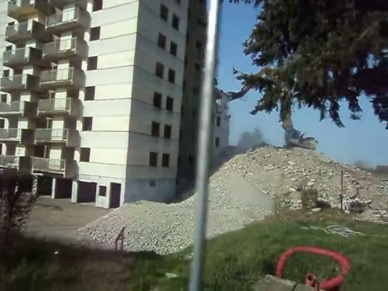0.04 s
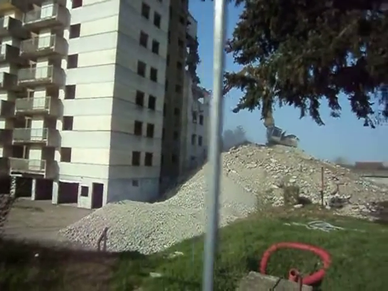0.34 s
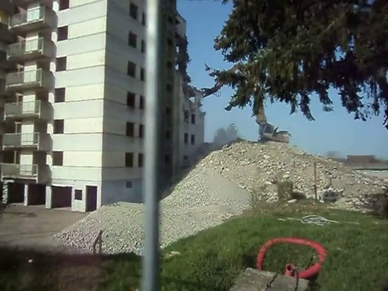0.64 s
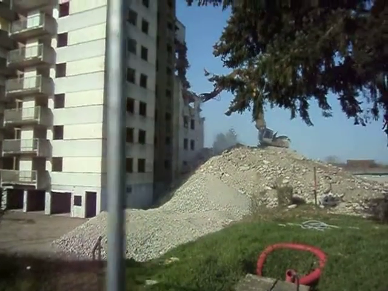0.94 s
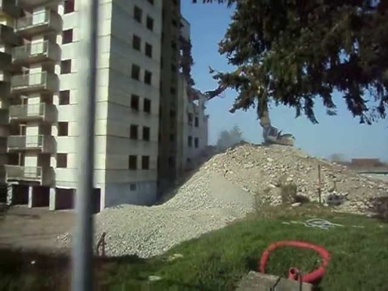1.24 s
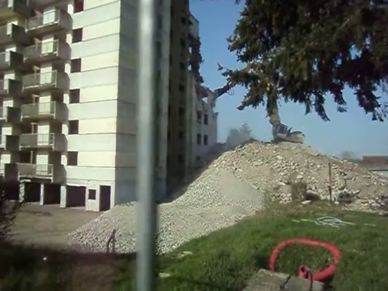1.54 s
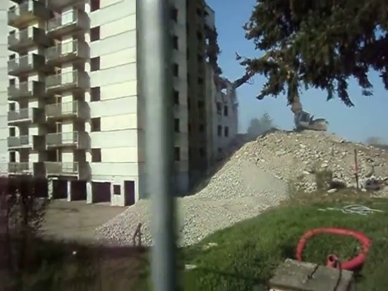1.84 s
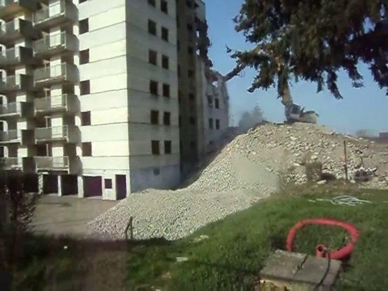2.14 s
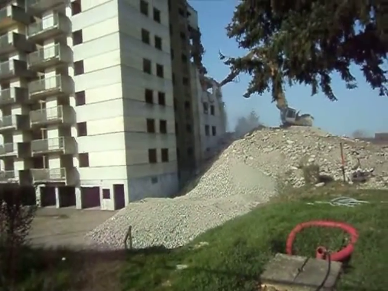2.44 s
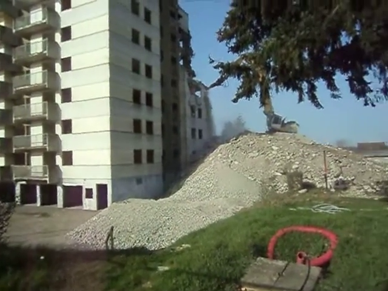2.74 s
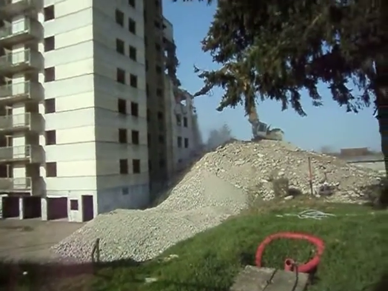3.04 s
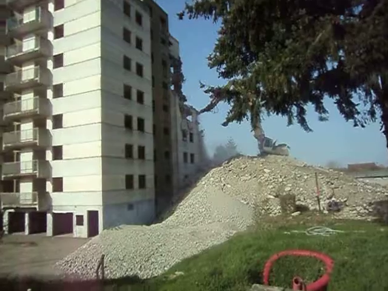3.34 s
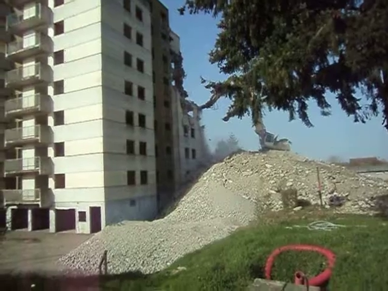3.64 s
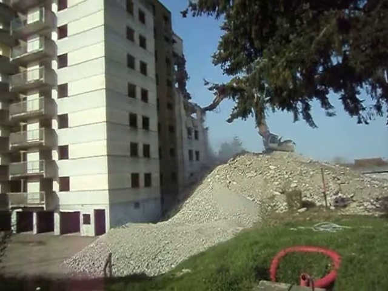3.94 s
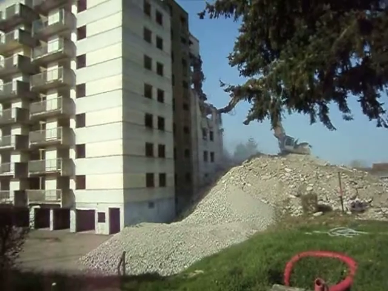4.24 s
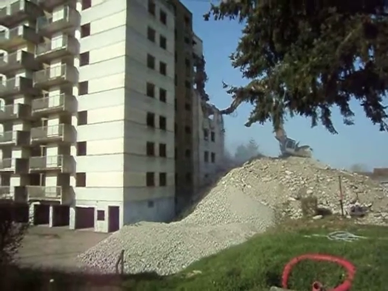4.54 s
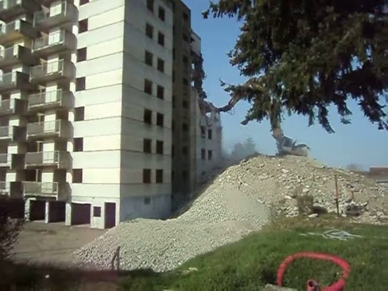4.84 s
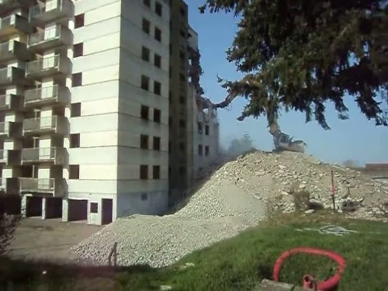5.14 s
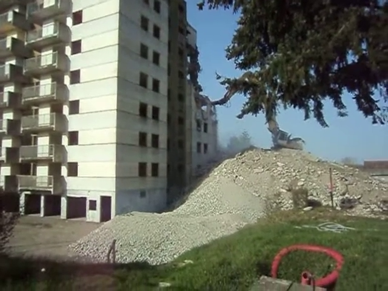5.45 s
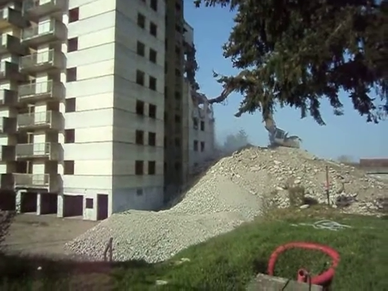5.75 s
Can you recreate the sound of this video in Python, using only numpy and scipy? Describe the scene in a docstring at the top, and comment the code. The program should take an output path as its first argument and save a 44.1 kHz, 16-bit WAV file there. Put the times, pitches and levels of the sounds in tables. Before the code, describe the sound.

Close clicks, pops and small rubs on the microphone stand out over the steady hum of a diesel excavator working some way off in the open air. Its steel rasps and sticks against crumbling concrete. Just past halfway the handling noises stop and chunks of concrete land with dull knocks, followed by several slides of rubble and more jerky metal scraping over the engine.

```python
"""A work site, where an excavator digs behind a rubble heap. Its diesel engine and cooling fan drone,
concrete crunches and tumbles, and steel rasps as it sticks and slips. Right at the microphone there are
brief rubs, sharp clicks and hollow pops. The loudest of these make the camera's gain control turn the
whole site down for about a second."""
import sys
import numpy as np
from scipy.fft import rfft, irfft, next_fast_len
from scipy.io import wavfile
from scipy.ndimage import uniform_filter1d, minimum_filter1d, map_coordinates

SR = 44100
rng = np.random.default_rng(int(sys.argv[2]) if len(sys.argv) > 2 else 0)


def inscribe(sig):
    """Save sig as 16-bit PCM at rate SR to the path in sys.argv[1].

    A 1-D sig is mono; a 2-D sig holds one channel per row.
    Samples are clipped to [-1, 1] before scaling.
    """
    pcm = np.round(np.clip(np.atleast_2d(sig).T, -1, 1) * 32767)
    wavfile.write(sys.argv[1], SR, pcm.astype(np.int16))


N = 265041


def amp(db):
    """Turn decibels into a number to multiply by."""
    return 10 ** (np.asarray(db) / 20)

def unit(x):
    """Scale a sound to an average strength (rms) of 1."""
    return x / np.sqrt(np.mean(x ** 2) + 1e-20)

def clock():
    """The time of every sample, in seconds."""
    return np.arange(N) / SR

def wobble(per_s):
    """A smooth curve through per_s random values a second."""
    return map_coordinates(rng.standard_normal(2048), [clock() * per_s], mode="wrap")

def swells(rest_db, rows):
    """A steady level in dB plus a bell-shaped swell for each row of peak_s, half_length_s, level_db."""
    power = sum(amp(db) ** 2 * np.exp(-((clock() - s) / half) ** 2 / 2) for s, half, db in rows)
    return 10 * np.log10(amp(rest_db) ** 2 + power)

def filtered(x, response):
    """Turn each frequency up or down by response(hz)."""
    size = next_fast_len(len(x) + 8192)
    return irfft(rfft(x, size) * response(np.fft.rfftfreq(size, 1 / SR)), size)[:len(x)]

def coloured(x, points):
    """Shape the bass and treble along a curve of pitch_hz, level_db points."""
    pitches, db = np.transpose(points)
    return filtered(x, lambda hz: amp(np.interp(np.log(hz + 1), np.log(pitches), db)))

def resonated(x, tones):
    """Make a sound ring at each row of pitch_hz, width_hz, level_db. Narrow tones ring longer."""
    return filtered(x, lambda hz: sum(
        amp(db) * 1j * hz * width / (pitch ** 2 - hz ** 2 + 1j * hz * width)
        for pitch, width, db in tones))

def grains(per_s, spread_db):
    """Tiny hits at random times, a few much stronger than the rest."""
    struck = rng.random(N) < per_s / SR
    sizes = amp(spread_db * np.minimum(rng.exponential(size=N), 4))
    return unit(struck * sizes * np.sign(rng.standard_normal(N)))

def add(track, start_s, sound):
    """Mix a sound into the track from start_s on."""
    part = track[max(round(start_s * SR), 0):][:len(sound)]
    part += sound[:len(part)]


# The hum of the exhaust: multiple_of_firing_rate, level_db
EXHAUST_TONES = [(3, -44), (6, -50.5), (7, -48.5)]
# Moments when the machine works harder: peak_s, fan_level_db
ENGINE_LOADS = [(0.082, -38.5), (1, -36.5), (2.3, -46.5), (3.999, -44), (5.72, -46)]
# Tone colour of the engine's roar: pitch_hz, level_db
ROAR_COLOUR = [(120, -25), (200, -1), (255, -7), (315, -1), (385, 4.5), (480, -21.5), (560, -6.5),
               (900, -8.5), (1300, -9.5), (2200, -16.5), (3400, -14.5), (4300, -23.5), (6000, -32.5)]

def engine(firing_hz=75.6, fan_idle_hz=290.2, fan_idle_db=-53.5, fan_hz_per_db=0.27):
    """A steady diesel hums and throbs with each firing. Under load its fan gets louder and higher."""
    cycle = 2 * np.pi * np.cumsum(firing_hz * (1 + 0.0016 * wobble(4))) / SR
    exhaust = sum(amp(db + 2.4 * wobble(6.1)) * unit(np.sin(multiple * cycle + 2 * np.pi * rng.random()))
                  for multiple, db in EXHAUST_TONES)
    fan_db = swells(fan_idle_db, [(peak_s, 0.25, db) for peak_s, db in ENGINE_LOADS])
    blade_hz = fan_idle_hz + fan_hz_per_db * (fan_db - fan_idle_db)
    blade_phase = 2 * np.pi * np.cumsum(blade_hz * (1 + 0.017 * wobble(30))) / SR
    fan = amp(fan_db + 1.5 * wobble(16)) * unit(np.sin(blade_phase))
    throb = 1 + 0.24 * np.cos(cycle)
    roar = unit(coloured(rng.standard_normal(N) * throb, ROAR_COLOUR))
    return exhaust + fan + amp(-37.5 + 1.7 * wobble(1.8)) * roar


# Tone colours of the low rumble and of crunching concrete: pitch_hz, level_db
RUMBLE_COLOUR = [(15, -35), (30, -1), (48, -10.5), (62, 1.5), (85, 4.5), (120, 2), (165, 4), (230, -3.5),
                 (500, -30)]
CRUNCH_COLOUR = [(200, -36), (400, -2.5), (560, 4), (760, 0.5), (930, -7), (1100, -1), (1400, -6),
                 (2200, -18), (3500, -16.5), (4600, -26.5), (6000, -33.5)]
# Slides of rubble: peak_s, half_length_s, crunch_db, rumble_db
RUBBLE_SLIDES = [(0.08, 0.2, -36, -37), (1.25, 0.11, -39, -58), (2.55, 0.18, -43.5, -55.5),
                 (3.458, 0.13, -47.5, -46), (4.15, 0.19, -34, -44.5), (4.741, 0.086, -31, -37.5),
                 (5.265, 0.14, -36.5, -34.5), (5.8, 0.18, -36, -42)]

def rubble(crunch_rest_db=-39.5, rumble_rest_db=-44.5):
    """Concrete crumbles in many tiny hits over a low rumble, swelling with each slide."""
    crunch_db = swells(crunch_rest_db, [(s, half, db) for s, half, db, _ in RUBBLE_SLIDES])
    rumble_db = swells(rumble_rest_db, [(s, half, db) for s, half, _, db in RUBBLE_SLIDES])
    rumble = amp(rumble_db + 0.32 * wobble(11)) * unit(coloured(rng.standard_normal(N), RUMBLE_COLOUR))
    crumbs = grains(per_s=700, spread_db=2.5) + 0.86 * rng.standard_normal(N)
    crunch = amp(crunch_db + 1.1 * wobble(22)) * unit(coloured(crumbs, CRUNCH_COLOUR))
    return rumble + crunch


# Big lumps of concrete landing: start_s, level_db, pitch_hz, thud_db (compared with the knock)
FALLING_LUMPS = [(2.547, -26.5, 610, -29), (2.574, -30, 418, -22), (3.3654, -23.5, 795, -8),
                 (3.382, -17, 706, -5.5), (3.406, -23.5, 640, -12), (3.445, -26.5, 666, -10),
                 (5.386, -26.5, 520, -13)]

def lumps(knock_fade_s=0.074, thud_fade_s=0.21, thud_hz=105):
    """Each lump lands with a dull knock of two close tones, a spray of grit and a thud in the ground."""
    out, t = np.zeros(N), np.arange(SR // 4) / SR
    for start_s, level_db, pitch_hz, thud_db in FALLING_LUMPS:
        grit = unit(coloured(rng.standard_normal(len(t)), CRUNCH_COLOUR))
        knock = np.sin(2 * np.pi * pitch_hz * 0.915 * t) + np.sin(2 * np.pi * pitch_hz * 1.1 * t)
        stone = (1.03 * knock + 1.32 * grit) * amp(-60 * t / knock_fade_s)
        thud = amp(thud_db - 60 * t / thud_fade_s) * np.sin(2 * np.pi * thud_hz * t)
        rise = 1 - np.exp(-t / 0.0033)
        add(out, start_s, amp(level_db) * rise * (stone + thud))
    return out


# Short jerks of steel that sticks and slips: start_s, level_db
STEEL_SLIPS = [(0.554, -33.5), (0.585, -35), (0.621, -35), (0.656, -36.5), (0.7, -34.5), (0.779, -34),
               (0.927, -39), (1.835, -43), (1.963, -41), (3.773, -39), (3.834, -39.5), (4.47, -36),
               (4.541, -37), (4.597, -37.5), (4.77, -37.5), (5.038, -35), (5.131, -33.5), (5.544, -33.5),
               (5.595, -35), (5.665, -33.5), (5.762, -34), (5.858, -32.5), (5.925, -33), (5.972, -32.5)]
# Longer drags of steel under load: start_s, level_db, length_s
STEEL_DRAGS = [(0.97, -46, .42), (1.086, -40.5, 0.13), (1.55, -41.5, 0.17), (2.237, -47.5, 0.026),
               (2.4, -46.5, 0.11), (2.58, -42.5, 0.19), (3.863, -41, .56), (4.632, -36.5, 0.11)]
# The tones the steel rings at: pitch_hz, width_hz, level_db
STEEL_TONES = [(1070, 43, -28), (1426, 41, -17), (1727, 9, 4.5), (1983, 27, 6.5), (2290, 4.3, 4.5),
               (2653, 34, 1), (2810, 24, -1), (3040, 87, -4), (3250, 82, 6), (3440, 43, 3.5),
               (3410, 17, -12), (3700, 92, -8)]
# Tone colour of the rasp: pitch_hz, level_db
RASP_COLOUR = [(500, -56.5), (1000, -14.5), (1600, 2), (2400, 4.5), (2950, 0), (3400, -3.5), (4000, -1),
               (4600, -37.5), (6000, -32)]

def scraping_steel(slip_length_s=0.015, rise_s=0.002, fade_s=0.17):
    """Each slip or drag rasps the steel. Its wide tones sound at once; narrow ones swell and linger."""
    t, power = np.arange(SR) / SR, np.zeros(N)
    slips = [(start_s, level_db, slip_length_s) for start_s, level_db in STEEL_SLIPS]
    bite_db = 3 * np.exp(-t / 0.022)  # each stroke starts a little harder
    for start_s, level_db, length_s in slips + STEEL_DRAGS:
        fade_db = 60 * np.maximum(t - length_s, 0) / fade_s
        stroke = np.minimum(t / rise_s, 1) * amp(level_db + bite_db - fade_db)
        add(power, start_s, stroke ** 2)
    force = (np.sqrt(power) + amp(-72)) * amp(0.97 * wobble(57))
    roughness = grains(per_s=2500, spread_db=3) + 0.68 * rng.standard_normal(N)
    ring = resonated(force * roughness, STEEL_TONES) / np.std(resonated(roughness, STEEL_TONES))
    rasp = force * unit(coloured(grains(per_s=4000, spread_db=8), RASP_COLOUR))
    return amp(-1) * ring + amp(-4.5) * rasp


# Rubs at the microphone: peak_s, level_db, half_length_s, pitch_hz
CLOSE_RUBS = [(0.389, -22.5, 0.0068, 1830), (1.449, -24.5, 0.0093, 1846), (1.469, -14.5, 0.0048, 1476),
              (1.739, -30, 0.016, 1433), (2.183, -19, 0.0035, 1367), (2.408, -31, 0.0096, 1354),
              (2.797, -25, 0.025, 721), (2.858, -18.5, 0.015, 706), (3.005, -15.5, 0.012, 780)]
# Higher tones of the rubbed hollow: multiple_of_pitch, width_hz, level_db
HOLLOW_TONES = [(2.081, 156, 12.5), (2.66, 171, -5), (3.899, 294, -2.5), (5.948, 200, 4.5)]
# Tone colour of the rubbing hiss: pitch_hz, level_db
FRICTION_COLOUR = [(200, -34.5), (600, 9.5), (1200, 4), (1600, -1.5), (2100, 7), (2500, -12), (3000, 3),
                   (3700, -7), (4600, -9), (6000, -24)]

def rubs(friction_db=2, grip_s=0.0079):
    """Gritty rubbing makes a small hollow ring with a wavering tone that swells and fades."""
    out, t = np.zeros(N), np.arange(-SR // 10, SR // 10) / SR
    for peak_s, level_db, half_length_s, pitch_hz in CLOSE_RUBS:
        grit, hiss, drift = rng.standard_normal((3, len(t)))
        high_tones = [(multiple * pitch_hz, width, db) for multiple, width, db in HOLLOW_TONES]
        high_ring = unit(resonated(grit, high_tones))
        friction = unit(high_ring + 2.4 * unit(coloured(hiss, FRICTION_COLOUR)))
        low_ring = np.sin(2 * np.pi * pitch_hz * t + 0.082 * np.cumsum(drift))
        swell = amp(level_db) * np.exp(-(np.abs(t) / half_length_s) ** 2.16 / 2)
        grip = 1 / (1 + (grip_s / half_length_s) ** 3)  # the briefest rubs mostly just ring
        add(out, peak_s + t[0], swell * (low_ring + amp(friction_db) * grip * friction))
    return out


# Clicks and pops at the microphone: start_s, level_db, pitch_hz, fade_s (time to fall by 60 dB)
CLOSE_CLICKS = [(0.3197, 7, 2540, 0.0061), (0.364, -22, 1910, 0.039), (0.844, -26.5, 1880, 0.031),
                (1.4352, 0, 2527, 0.0068), (1.445, -14.5, 2430, .01), (1.6504, -1.5, 1365, 0.038),
                (2.1052, -15.5, 1326, 0.029), (2.1295, -22, 1360, 0.02), (2.1759, -20, 1327, 0.015),
                (2.5723, -11.5, 812, 0.058), (2.668, -23, 2000, 0.0029), (2.701, -31, 2320, 0.0059),
                (2.714, -18.5, 2370, 0.011), (2.7246, 7, 1927, 0.0017), (2.772, -5.5, 1380, 0.0034),
                (2.9604, -7.5, 880, 0.0084), (3.1806, -17.5, 2550, 0.005), (3.2228, -21.5, 2650, 0.0025)]

def clicks(upper_ratio=1.739, even_fade_s=0.0071, crack_db=-4.5):
    """Each click is two short tones inside a crack of noise. The shorter it is, the brighter."""
    out, t = np.zeros(N), np.arange(SR // 8) / SR
    for start_s, level_db, pitch_hz, fade_s in CLOSE_CLICKS:
        upper_hz = upper_ratio * pitch_hz
        upper_db = -4 * np.log2(fade_s / even_fade_s)  # at even_fade_s both tones are equally strong
        tones = np.sin(2 * np.pi * pitch_hz * t) + amp(upper_db) * np.sin(2 * np.pi * upper_hz * t)
        colour = [(pitch_hz / 10, -14), (pitch_hz / 2, -8), (pitch_hz, 0),
                  (upper_hz, 0), (2 * upper_hz, -6), (8000, -11)]
        noise = unit(coloured(rng.standard_normal(len(t)), sorted(colour)))
        crack_fade_s = 0.5 * fade_s + 0.0083
        crack = amp(crack_db - 60 * t / crack_fade_s) * noise
        add(out, start_s, amp(level_db) * (tones * amp(-60 * t / fade_s) + crack))
    return out


def scene():
    """The far machine and its rubble, plus the small noises at the microphone, in one channel."""
    return (engine() + rubble() + lumps() + scraping_steel() + rubs() + clicks())[None]

def gain_control(x, threshold_db, recovery_db_per_s):
    """Turn the volume down just before a loud sound, then let it climb slowly back."""
    level = uniform_filter1d(np.abs(x), size=64)
    excess_db = np.maximum(20 * np.log10(np.abs(level) + 1e-9) - threshold_db, 0)
    nearby_peak_db = -minimum_filter1d(-excess_db, size=96)
    climb_db = recovery_db_per_s * clock()
    cut_db = np.maximum.accumulate(nearby_peak_db + climb_db) - climb_db
    return x * amp(-uniform_filter1d(cut_db, size=32))


# How strongly the microphone picks up each pitch: pitch_hz, level_db
MICROPHONE_COLOUR = [(20, -2.5), (4500, 1), (5100, -4), (5600, -15), (6300, -30.5)]

def record(dry, treble_edge_hz=6300, top_hz=16500):
    """The camera turns loud moments down and cuts the high treble. Sharp peaks overload it."""
    picked_up = coloured(dry[0], MICROPHONE_COLOUR)
    turned_down = gain_control(picked_up, threshold_db=-14, recovery_db_per_s=16.5)
    overloaded = np.clip(turned_down, -0.76, 0.76)
    dulled = filtered(overloaded, lambda hz: 1 / (1 + (hz / treble_edge_hz) ** 80))
    snapped = np.clip(dulled, -0.72, 0.72)  # flattening the sharpest peak again adds a bright snap
    return filtered(snapped, lambda hz: hz < top_hz)[None]


dry = scene()
out = record(dry)
inscribe(out)
```